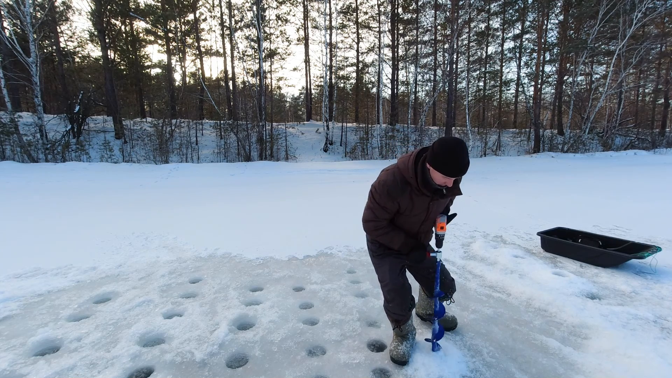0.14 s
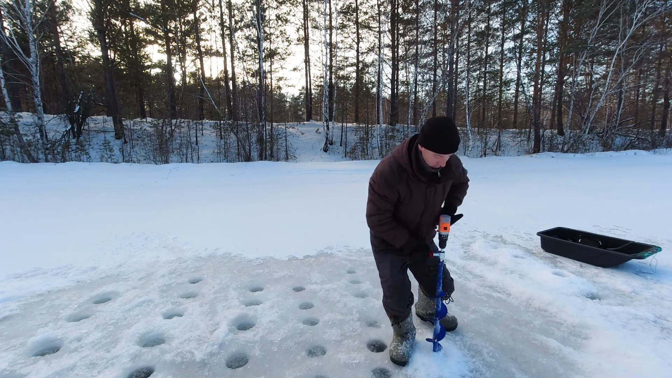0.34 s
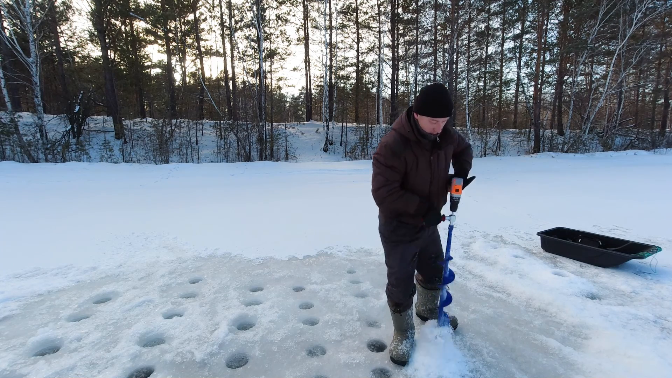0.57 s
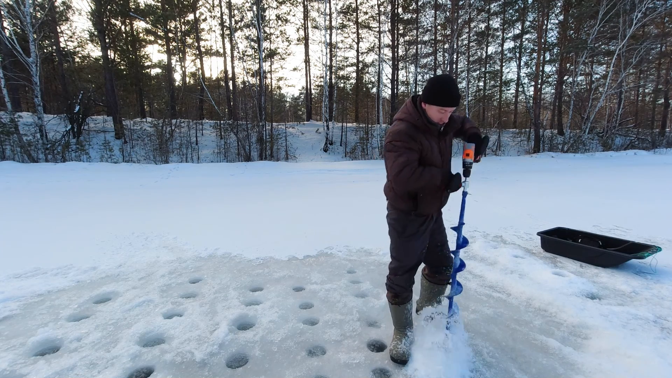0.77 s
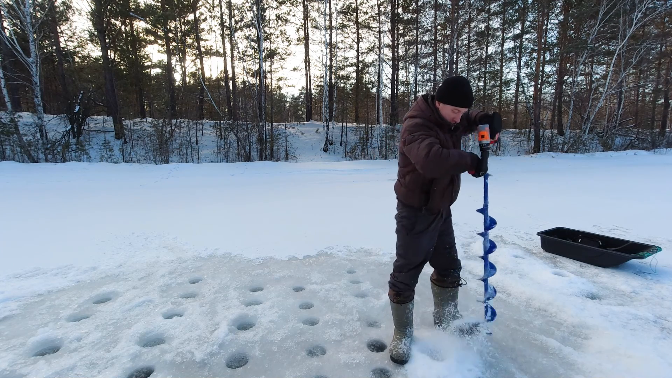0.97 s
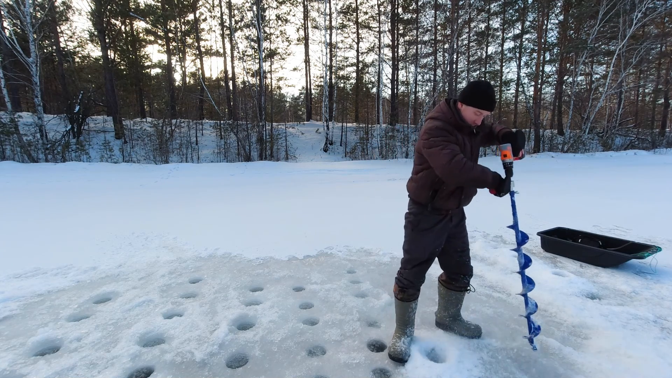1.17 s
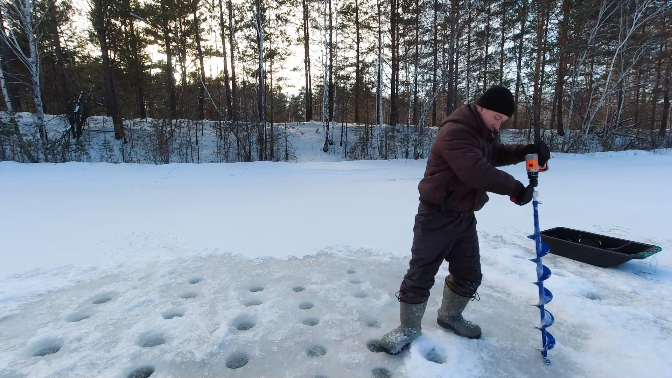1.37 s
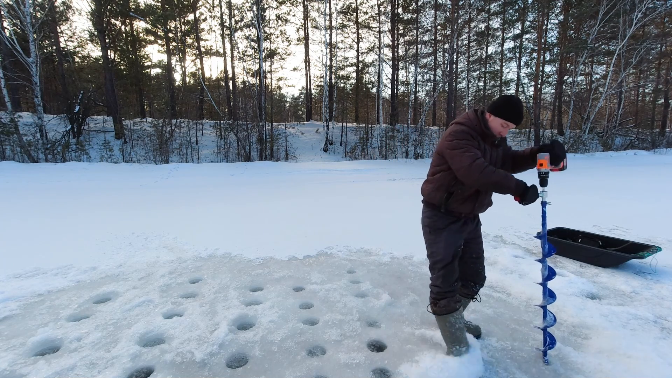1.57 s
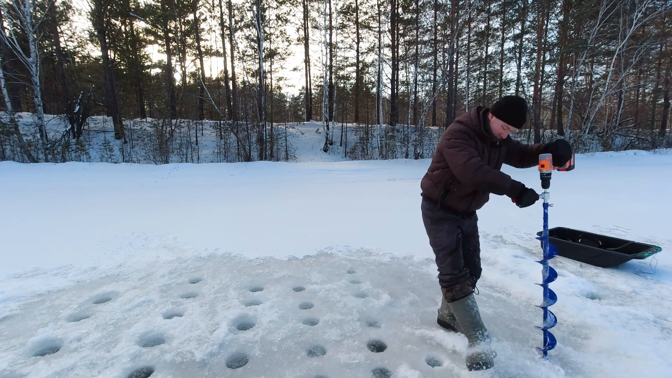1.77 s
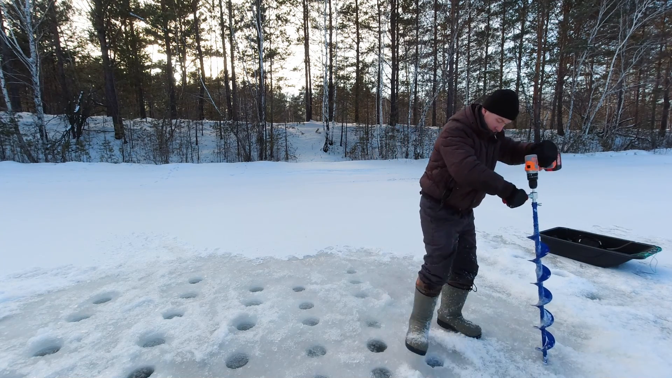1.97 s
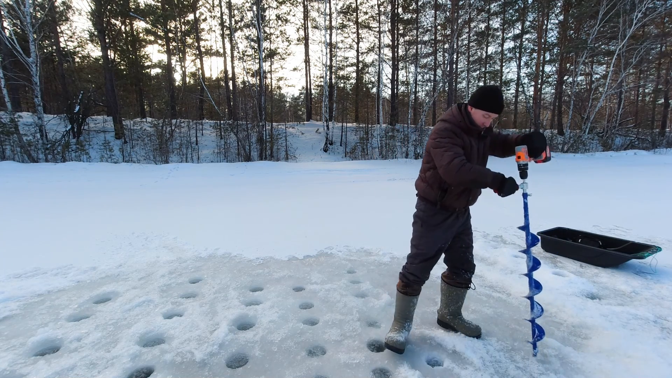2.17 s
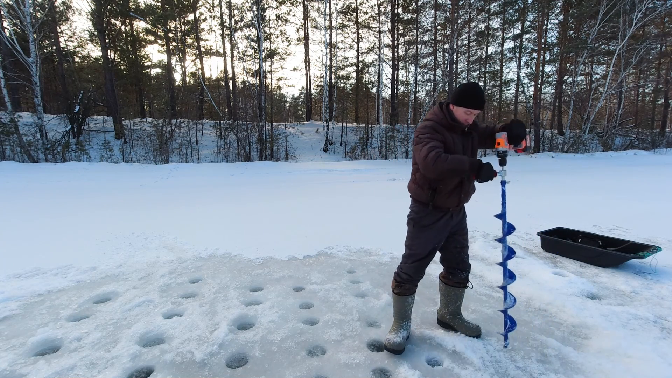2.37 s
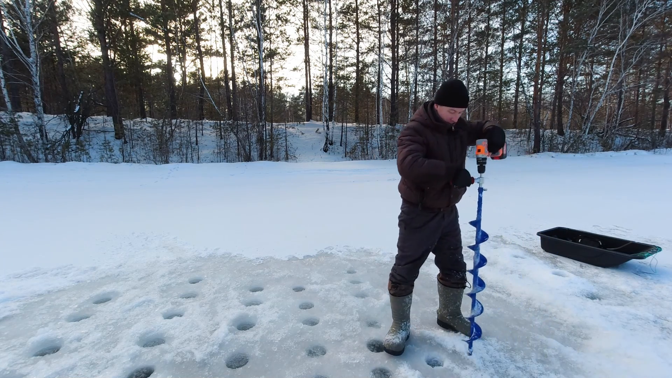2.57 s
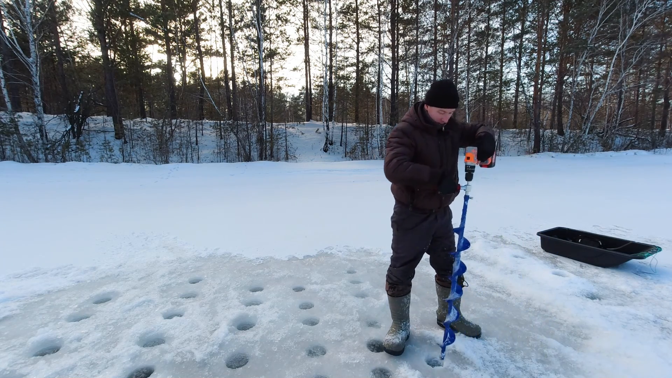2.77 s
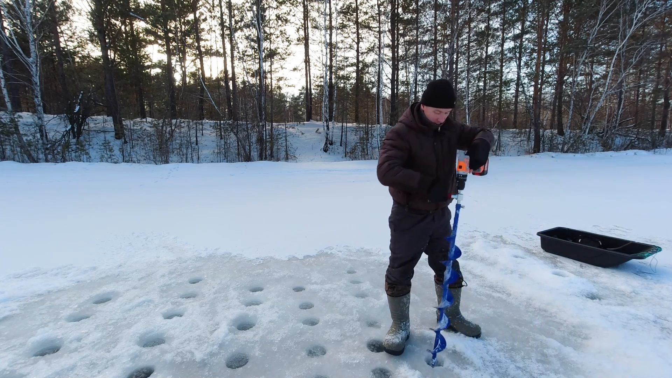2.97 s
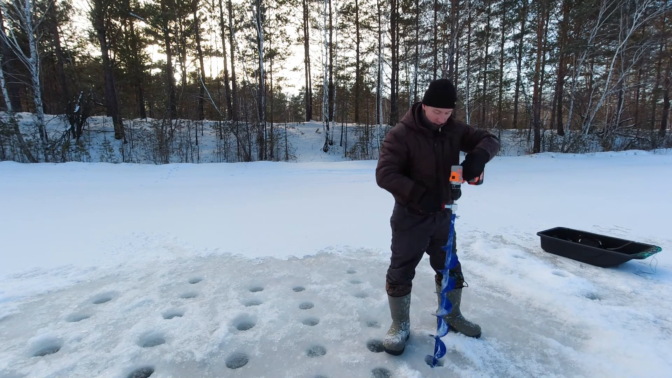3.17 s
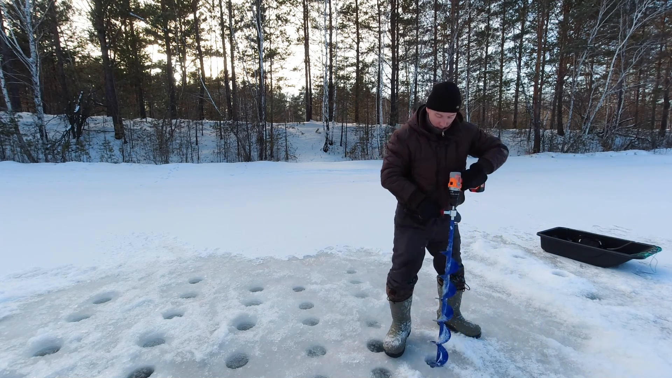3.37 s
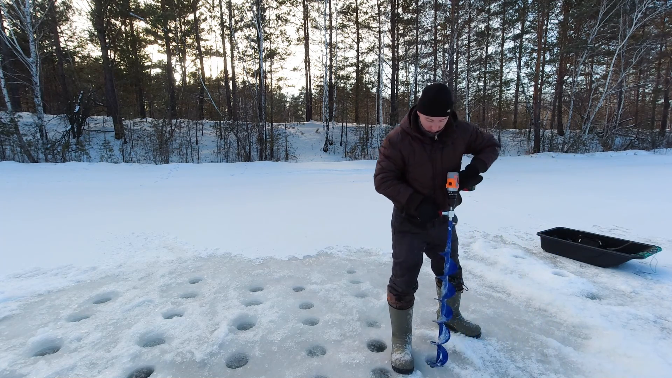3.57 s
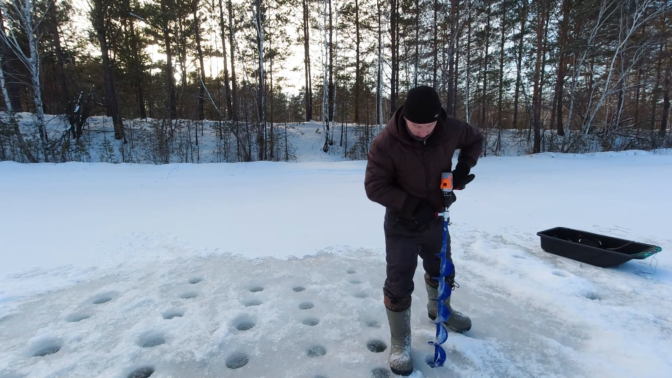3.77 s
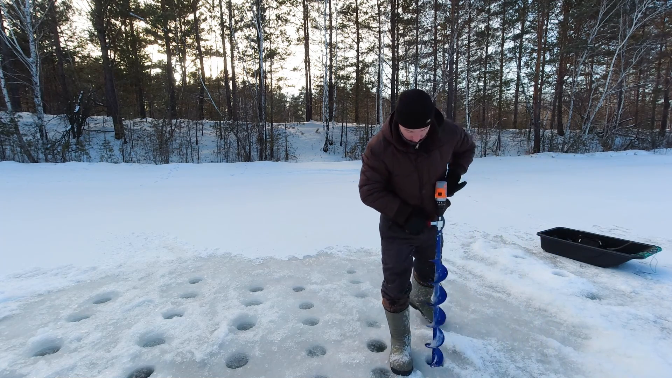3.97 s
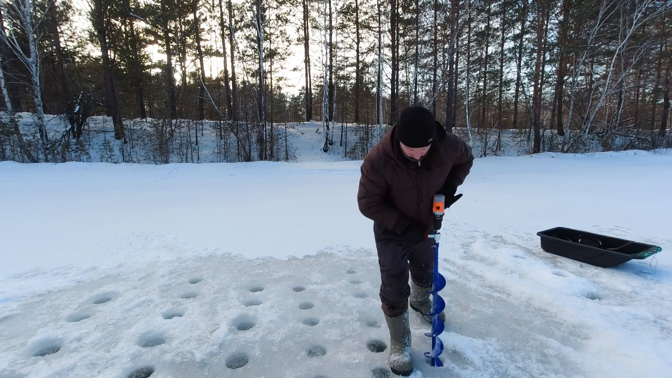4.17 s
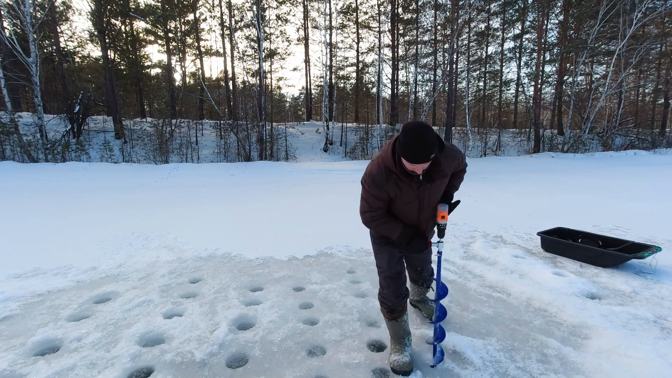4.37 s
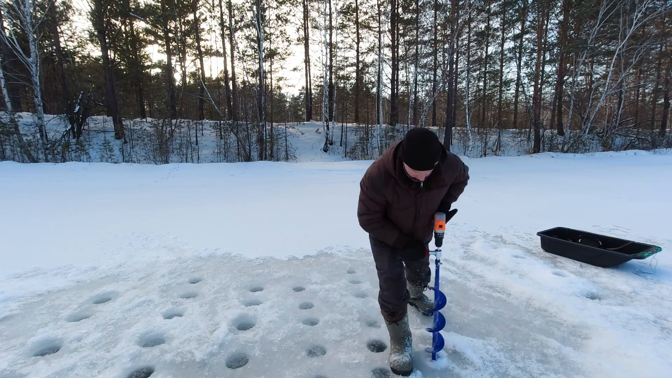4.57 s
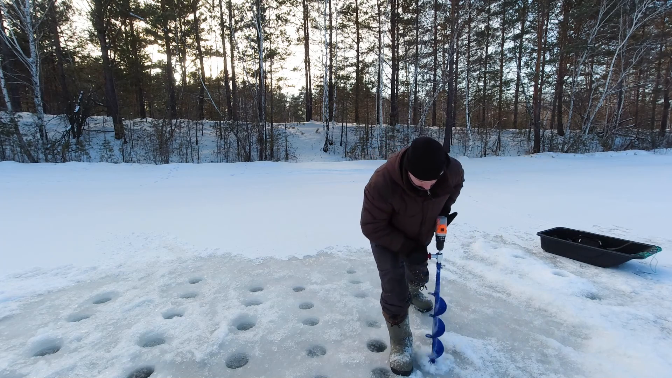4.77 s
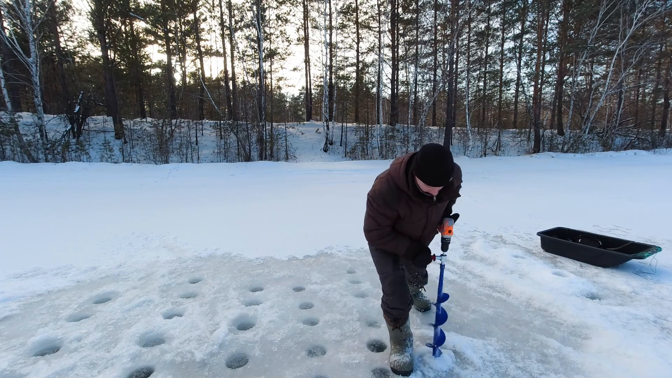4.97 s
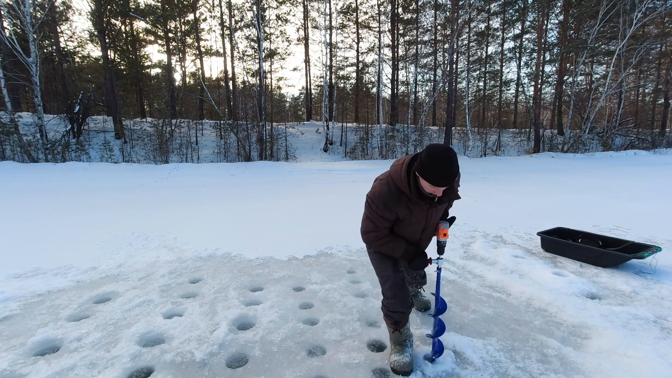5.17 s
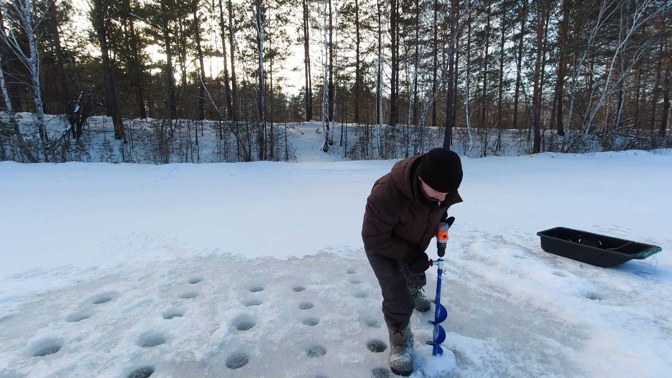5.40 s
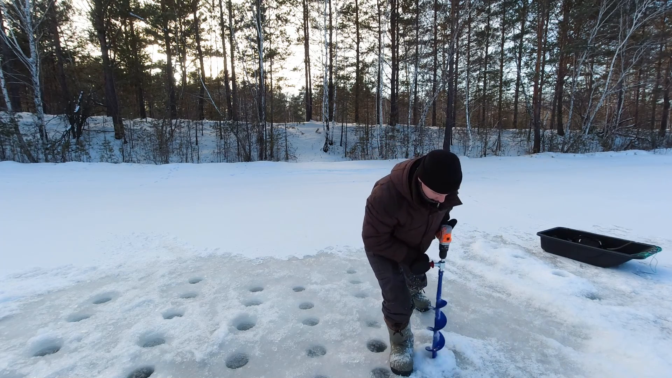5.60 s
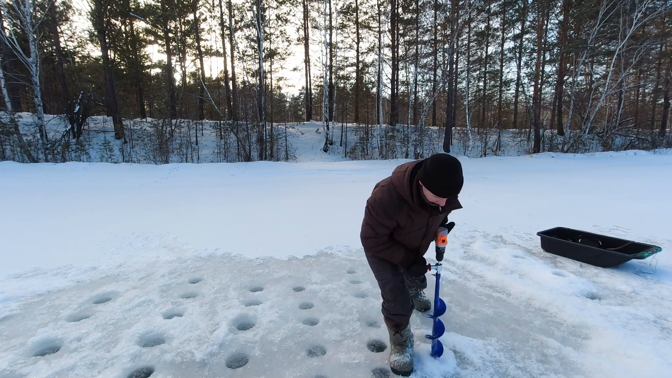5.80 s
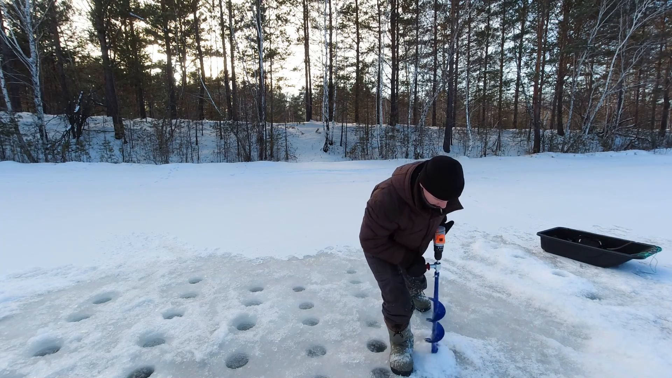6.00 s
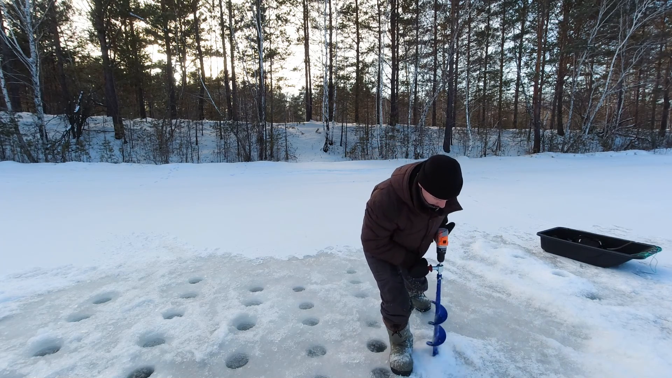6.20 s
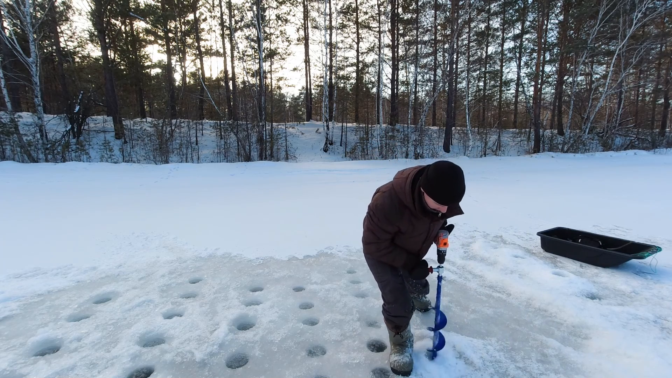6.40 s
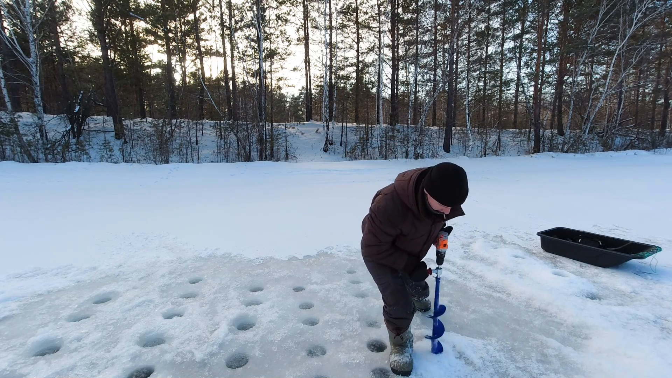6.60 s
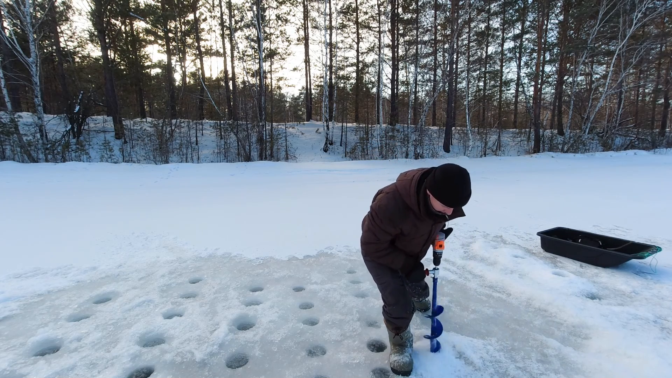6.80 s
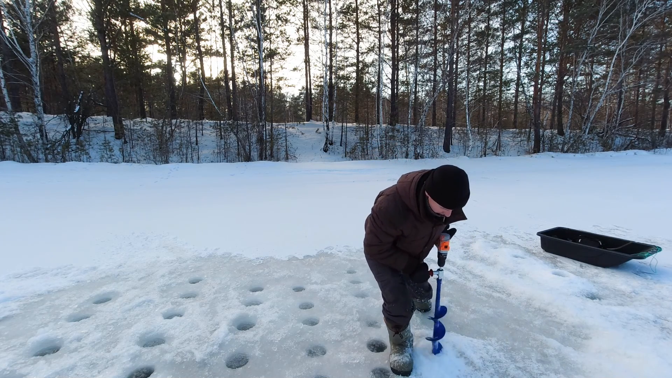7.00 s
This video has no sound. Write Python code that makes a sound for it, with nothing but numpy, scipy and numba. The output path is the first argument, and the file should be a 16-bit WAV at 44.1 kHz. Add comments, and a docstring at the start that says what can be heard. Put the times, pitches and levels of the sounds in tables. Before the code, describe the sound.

Open frozen lake, dry and quiet, faint low hum and slight wind, stereo microphone a few metres away. At 0 s the end of a drill run grinds and whines, dropping off within a tenth of a second into rapid soft ticks until about 0.25. From 0.5 to 0.8 the steel blades clatter in a fast, hard rattle as the auger comes free. From 0.7 to 2.4 loose snow pours off in bright gritty hisses, with boots crunching, dull thuds and crust pops. About 2.6 to 3.0 is almost silent, with tiny clicks. At 3.1 to 3.65 blades skid and scrape in quick ringing bursts, plus a few snow crunches. Near 4.0 the motor spins up to a high, rough whine with loud cracks; from 4.5 it sags and wavers lower as the blades grind ice steadily, rumbling, chattering and squeaking, still going at 7 s.

```python
"""Auger drilling lake ice

A cordless drill drives a steel auger into lake ice a few metres from a camera with two microphone ports.
The blades skid, chatter and grind: noise fractures ring the hole and the steel over a rumbling ice sheet.
The gearbox whines as tones in rough strands, the motor hisses, and blade edges squeak as sine glides.
Loose snow pours off the flights as bright grit; boots crunch and crust pops over a faint winter hum."""
import sys
import numpy as np
from scipy import signal
from scipy.fft import rfft, irfft, next_fast_len
from scipy.io import wavfile
from scipy.ndimage import uniform_filter1d
from numba import njit

SR = 44100
rng = np.random.default_rng(int(sys.argv[2]) if len(sys.argv) > 2 else 0)


def store_pcm(level_fs):
    """Save levels as 16-bit WAV."""
    pcm = np.round(np.clip(level_fs, -1, 1) * 32767).astype(np.int16)
    wavfile.write(sys.argv[1], SR, np.atleast_2d(pcm).T)


N = 310905  # samples, about 7 s


def undb(db):
    """Amplitude gain of a level in dB."""
    return 10 ** (np.asarray(db) / 20)


def unit(x):
    """Scale to an RMS of 1."""
    return x / np.sqrt(np.mean(x ** 2))


def noise():
    """White noise over the whole scene."""
    return rng.standard_normal(N)


def steady(hz):
    """A fixed frequency at every sample."""
    return np.full(N, float(hz))


def columns(*tables):
    """A smoothed gate that is open inside the tables, then their columns interpolated at every sample."""
    t = np.arange(N) / SR
    times, *values = np.concatenate(tables).T
    gate = sum((t > rows[0][0] - .001) & (t < rows[-1][0] + .01) for rows in tables)
    return [uniform_filter1d(1. * gate, 441)] + [np.interp(t, times, column) for column in values]


def colour(x, points):
    """Causal filter with the given (f/Hz, level/dB) shape, from the folded cepstrum."""
    hz, db = np.transpose(points)
    grid = np.linspace(1, SR / 2, 2049)
    shape_db = np.interp(np.log(grid), np.log(hz), db)
    cepstrum = irfft(np.log(undb(shape_db)))
    cepstrum[1:2048] *= 2
    impulse = irfft(np.exp(rfft(cepstrum[:2048], 4096)))
    return signal.oaconvolve(x, impulse)[:len(x)]


@njit
def ring(x, hz, width):
    """Band-pass resonance, width in Hz, whose centre may move every sample."""
    y, band, low = np.empty(len(x)), 0., 0.
    for i in range(len(x)):
        g = np.tan(np.pi * hz[i] / SR)
        damping = width / hz[i]
        v = (band + g * (x[i] - low)) / (1 + g * (g + damping))
        band, low, y[i] = 2 * v - band, low + 2 * g * v, damping * v
    return y


def walk(rate):
    """Random levels held 1 / rate s and slewed; spread near 1."""
    hold = int(SR / rate)
    steps = np.repeat(rng.standard_normal(N // hold + 1), hold)[:N]
    return 1.2 * uniform_filter1d(steps, hold)


LARGEST = 7  # cap on a fracture's size, in steps of the spread


def grains(spread_db, flicker_db, flicker_hz):
    """Dense fractures, a few much larger than the rest, coming in clumps."""
    size = np.minimum(rng.exponential(size=N), LARGEST)
    return unit(noise() * undb(spread_db * size + flicker_db * walk(flicker_hz)))


RISE_DB = 23  # height of the climb


def swell(s, rise, hold, db, fall_db_s):
    """Gain that climbs to a level, holds and falls at a steady rate in dB/s."""
    t = np.arange(N) / SR - s
    climb = RISE_DB * np.minimum(t / max(rise, .002) - 1, 0)
    return (t > 0) * undb(db + climb - fall_db_s * np.maximum(t - rise - hold, 0))


# tone colours of the far hum and the wind: (f/Hz, level/dB)
HUM_COLOUR = [(40, -12), (110, -4.5), (160, -15.5), (200, -9.5), (400, -8), (650, -10.5), (1000, -17.5),
              (1500, -28.5), (3000, -39.5), (5000, -58), (15000, -62)]
WIND_COLOUR = [(10, -7), (25, -3), (50, -1), (90, -27.5), (200, -45)]
HUM_DB, HUM_SWELL_DB, WIND_DB = -54, 1.8, -57  # hum level is that of the part the ports share


def air():
    """Far hum of the valley, alike on both ports in the bass; light wind flutters on each port alone."""
    mid, side = (colour(noise() * undb(HUM_SWELL_DB * walk(5.0)), HUM_COLOUR) for _ in range(2))
    side = side - ring(side, steady(180), 710.0)  # thin the bass of the difference
    hum = np.array([mid + 0.57 * side, mid - 0.69 * side]) / np.std(mid)
    wind = [unit(colour(noise() * undb(5.8 * walk(1.0)), WIND_COLOUR)) for _ in range(2)]
    return undb(HUM_DB) * hum + undb(WIND_DB) * np.array(wind)


# tone colour of the tree line's echo: (f/Hz, level/dB)
SHORE_COLOUR = [(300, -24.5), (1500, -18.5), (4000, -4), (8000, -30)]


def shore(x, echo_db, t60):
    """A faint diffuse return from the trees: decaying noise, unrelated left and right."""
    t = np.arange(int(.6 * SR)) / SR
    decay = undb(-60 * t / t60)
    tails = [unit(colour(rng.standard_normal(len(t)), SHORE_COLOUR)) * decay for _ in range(2)]
    return undb(echo_db) * signal.oaconvolve(x[None], np.array(tails), axes=1)[:, :N]


# boots pressing snow: (t/s, rise/s, hold/s, level/dB, thud level/dB against it)
BOOTS = [(0.791, 0.022, 0.29, -53.5, -5.5), (1.051, 0.025, 0.051, -48, 1), (1.15, 0.036, 0.045, -46, -0.5),
         (1.2, 0.08, 0.07, -46.5, -16), (1.263, 0.11, 0.039, -35.5, -16.5), (1.471, 0.076, 0.14, -31, -2.5),
         (1.705, 0.029, 0.11, -47, -23.5), (1.802, 0.04, 0.35, -58, -1.5), (2.249, 0.1, 0.0078, -37.5, -21),
         (2.526, 0.0039, 0.015, -52, -6.5), (2.583, 0.011, 0.0035, -51.5, -17),
         (3.404, 0.034, 0.22, -62.5, 1.5), (3.691, 0.03, 0.042, -45, -1.5), (3.763, 0.045, 0.077, -58.5, 1)]
# lumps of snow crust giving way, and one dry crack of the blades at 3.9 s: (t/s, initial level/dB, f/Hz)
POPS = [(0.939, -33, 11000), (1.095, -21, 13000), (1.105, -33.5, 227), (1.184, -25.5, 660),
        (1.279, -18.5, 10200), (1.2815, -19.5, 10300), (1.589, -25.5, 485), (1.621, -44, 326),
        (1.649, -14.5, 790), (1.664, -20, 197), (2.337, -24.5, 1560), (2.35, -34, 149),
        (2.535, -43.5, 1490), (2.536, -41.5, 224.4), (2.595, -34.5, 1100), (2.7055, -47.5, 1960),
        (2.7402, -55.5, 2460), (2.798, -54, 2090), (2.852, -59, 2200), (2.9492, -56, 2310),
        (3.545, -46, 2500), (3.76, -25.5, 920), (3.9068, -20, 3360), (3.706, -38.5, 1500)]
# tone colours of the creak and the thud: (f/Hz, level/dB)
TREAD_COLOUR = [(400, -10), (900, -6), (2000, -8), (3400, -9.5), (4500, -18), (9000, -49), (16000, -41)]
THUD_COLOUR = [(30, -11), (90, 1), (200, -5), (500, -3.5), (900, -29.5)]
BOOT_FALL_DB_S = 453


def boots():
    """Packed snow creaks under the sole with a dull thud; lumps of crust pop, and the blades crack once, as
    short decaying sines."""
    creak_gain, thud_gain = 0, 0
    for s, rise, hold, db, thud_db in BOOTS:
        press = swell(s, rise, hold, db, BOOT_FALL_DB_S)
        creak_gain = creak_gain + press
        thud_gain = thud_gain + press * undb(thud_db)
    out = creak_gain * unit(colour(grains(1.8, 2.2, 100), TREAD_COLOUR))
    out += thud_gain * unit(colour(grains(1.4, 0.54, 29.7), THUD_COLOUR))
    t = np.arange(int(0.022 * SR)) / SR
    for s, peak_db, hz in POPS:
        i = int(s * SR)
        pop = np.exp(-t * hz / 1.94) * np.sin(2 * np.pi * hz * t)  # fades within a few cycles
        out[i:i + len(t)] += undb(peak_db) * pop
    return out


# snow pouring off the flights, two spells: (t/s, level/dB)
SPRAY = [
    [(0.72, -31), (0.728, -43), (0.988, -31), (1.158, -41), (1.2, -36), (1.266, -36.5), (1.276, -31.5),
     (1.344, -42.5), (1.392, -30), (1.48, -59)],
    [(1.48, -58), (1.53, -37.5), (1.67, -28.5), (1.704, -36), (1.756, -24), (1.894, -28), (1.956, -21.5),
     (2.19, -29), (2.4, -60.5), (2.62, -73.5)],
]
# snow thrown up by the skidding blades: (t/s, rise/s, hold/s, level/dB)
THROWN = [(0.571, 0.0096, 0.11, -33), (0.626, 0.027, .02, -32), (3.2, 0.016, 0.098, -30.5),
          (3.331, 0.011, 0.0081, -27), (3.38, .005, 0.21, -73), (3.586, 0.044, 0.0057, -40),
          (3.645, .005, 0.174, -70)]
# tone colour of loose snow: (f/Hz, level/dB)
SNOW_COLOUR = [(2500, -36), (3600, -10), (6000, -8.5), (8500, -10), (9800, 5), (11000, 4.5), (13000, -0.5),
               (15400, 2.5)]
THROWN_FALL_DB_S = 898.5


def spray():
    """Fine crystals: a bright, slightly gritty hiss."""
    gate, db = columns(*SPRAY)
    gain = gate * undb(db) + sum(swell(*row, THROWN_FALL_DB_S) for row in THROWN)
    return gain * unit(colour(grains(1.86, 1.0, 120), SNOW_COLOUR))


# motor speed, sagging under load, two runs: (t/s, gear mesh f/Hz, whine level/dB)
SPEED = [
    [(0.0, 2406, -23), (0.07, 466.9, -59)],
    [(3.9, 300.6, -53.5), (3.99, 1100, -49), (4.05, 2691, -51), (4.09, 2915, -24), (4.12, 3234, -27),
     (4.155, 3364, -23.5), (4.28, 3326, -26), (4.36, 2950, -52), (4.43, 3109, -29), (4.5, 3310, -26.5),
     (4.53, 3017, -33), (4.61, 2950, -25), (4.65, 2720, -27), (4.75, 2690, -32), (4.79, 2697, -35),
     (4.83, 2704, -28), (4.89, 2667, -33), (4.93, 2535, -29), (5.0, 2427, -32), (5.11, 2710, -26),
     (5.18, 2558, -39), (5.3, 2553, -31.5), (5.35, 2402, -30), (5.41, 2133, -47), (5.46, 1992, -25),
     (5.51, 2312, -29), (5.58, 2510, -36), (5.64, 2500, -42), (5.74, 2620, -35), (5.8, 2689, -42),
     (6.0, 2700, -46), (6.07, 3020, -37), (6.125, 3100, -33), (6.14, 3000, -52), (6.17, 2680, -37),
     (6.2, 2700, -46), (6.27, 2600, -40), (6.3, 2520, -28), (6.38, 2290, -29), (6.45, 2230, -30),
     (6.52, 2174, -32), (6.55, 2430, -26), (6.59, 2460, -25), (6.62, 2714, -33), (6.69, 2803, -35),
     (6.72, 2550, -39), (6.75, 2420, -30), (6.81, 2440, -30.5), (6.835, 2590, -40), (6.9, 2790, -28),
     (7.05, 2720, -43.5)],
]
# tone colour of the motor: (f/Hz, level/dB)
MOTOR_COLOUR = [(2500, -14.5), (4000, -2), (5200, -3.5), (6100, -8.5), (7700, -10), (10500, -4.5),
                (13000, -12), (15500, -14.5)]
LOADED_HZ, HISS_DB, HISS_POWER = 2500, -29.5, 1.7  # mesh and level at the loaded speed; power of speed


def motor_hiss():
    """The motor's broad hiss grows as a power of its speed."""
    turning, mesh_hz, _ = columns(*SPEED)
    hiss = unit(colour(grains(0.33, 1.0, 60), MOTOR_COLOUR))
    return turning * undb(HISS_DB) * hiss * (mesh_hz / LOADED_HZ) ** HISS_POWER


# rough strands of the gear train: (multiple of the mesh f, level/dB)
ORDERS = [(1 / 6, -17.5), (1 / 3, -9), (1 / 2, -18), (2 / 3, -7), (5 / 6, -11), (1, 0)]
BREAK_DB = 7  # how deeply the whine breaks up


def gears():
    """Teeth knock unevenly, so each order is a wavering tone in a rough strand."""
    gate, mesh_hz, whine_db = columns(*SPEED)
    whine = 0
    for order, order_db in ORDERS:
        hz = order * mesh_hz
        strand = unit(ring(grains(2.0, 1.8, 60), hz * (1 + 0.008 * walk(30)), 45.0))
        tone = np.sin(2 * np.pi * np.cumsum(hz * (1 + .009 * walk(80))) / SR)
        strand = strand * undb(-BREAK_DB * np.abs(walk(40)))
        tone = tone * undb(-BREAK_DB * np.abs(walk(45)))
        whine = whine + undb(order_db) * (.8 * strand + 1.2 * tone)
    return gate * undb(whine_db) * whine


# the chuck runs out: start t/s, stop t/s, pairs of ticks per s
COAST_START, COAST_STOP, COAST_RATE = .052, .256, 39.5
COAST_HZ, COAST_DB = 2450, -66.5  # centre of the ticks; their RMS over the whole scene
# tone colour of the blades: (f/Hz, level/dB)
BLADES_COLOUR = [(300, -28.5), (700, -5.5), (1100, -2), (1700, -1), (2500, -1.5), (3600, -1.5), (4800, -19),
                 (7700, -49), (16000, -40)]


def chuck_ticks():
    """Gear teeth tick as the chuck runs out: puffs of noise ring a narrow band over a soft hiss."""
    t = np.arange(N) / SR
    running = (t > COAST_START) * (t < COAST_STOP)
    turn = np.cos(2 * np.pi * COAST_RATE * (t - COAST_START))
    # strong and weak ticks alternate
    puffs = running * (0.43 + np.abs(turn) ** 4.0 * (0.49 + 0.27 * turn))
    ticks = unit(ring(noise() * puffs, steady(COAST_HZ), 150.0))
    hiss = unit(colour(noise() * (puffs > 0), MOTOR_COLOUR))
    rattle = unit(colour(noise() * puffs, BLADES_COLOUR))
    return undb(COAST_DB) * (ticks + 0.092 * hiss + 0.65 * rattle)


# a blade edge squeaks on the ice: (t/s, length/ms, from f/Hz, to f/Hz, level/dB before the husk)
SQUEAKS = [(4.071, 160, 548, 517.5, -35.5), (4.09, 43, 1950, 1973, -28.5), (4.175, 29, 2450, 2410, -36),
           (4.179, 33, 1330, 1290, -35), (4.51, 42, 452, 492, -34), (4.642, 20, 2070, 2100, -26),
           (4.794, 23, 3170, 2590, -27), (4.89, 106, 1690, 1730, -24), (4.989, 50, 1744, 1790, -26),
           (5.084, 50, 1714, 1674, -31.5), (5.18, 57, 1613, 1606, -25.5), (5.31, 60, 1790, 1708, -23),
           (5.38, 90, 1282, 1450, -24.5), (5.55, 54, 1590, 1732, -22.5), (5.585, 55, 1100, 1035, -26),
           (5.66, 67, 1990, 1970, -25), (5.72, 75, 1950, 2380, -30.5), (5.78, 47, 1194, 1112, -26),
           (5.87, 83, 2030, 2210, -26.5), (5.96, 55, 1565, 1407, -26), (6.14, 76, 1800, 1860, -33.5),
           (6.169, 33, 863, 936, -37), (6.283, 49, 1686, 1520, -27), (6.4, 34, 1740, 1750, -40.5),
           (6.645, 53, 2090, 2160, -28), (6.67, 65, 1286, 1253, -37), (6.88, 63, 967, 928, -36.5)]


def squeaks():
    """A sliding blade edge gives short gliding tones, slightly husky."""
    out = np.zeros(N)
    for s, length_ms, from_hz, to_hz, db in SQUEAKS:
        i, n = int(s * SR), int(length_ms / 1000 * SR)
        glide = np.sin(2 * np.pi * np.cumsum(np.linspace(from_hz, to_hz, n)) / SR)
        out[i:i + n] += undb(db) * np.sqrt(2 * np.hanning(n)) * glide
    return out * (.55 + .8 * walk(260))


# modes of the auger: (f/Hz, width/Hz, level/dB)
AUGER_MODES = [(616, 550, 2.5), (1100, 88, 2), (1450, 120, 10), (1980, 110, 13), (2500, 100, 4),
               (2950, 150, 7), (3610, 123, 6.5)]


def steel(x):
    """The auger's fixed modes, alternating in sign."""
    return sum((-1) ** k * undb(db) * ring(x, steady(hz), float(width))
               for k, (hz, width, db) in enumerate(AUGER_MODES))


# the blades slip and catch: (t/s, nominal peak level/dB, strongest ring f/Hz, length/ms)
SLIPS = [(0.236, -35, 1620, 13), (0.513, -24.5, 1455, 22), (0.536, -28, 1050, 22), (0.557, -26, 2680, 21),
         (0.579, -11, 2590, 27), (0.6, -11.5, 1860, 19.5), (0.622, -14.5, 1325, 18), (0.639, -9, 730, 3),
         (0.648, -10.5, 1776, 17), (0.67, -10, 2410, 14), (0.69, -19, 1360, 24), (0.708, -7, 1960, 18),
         (0.739, -4, 1664, 10.5), (0.752, -14, 1580, 17), (0.778, -13, 2100, 20.7), (3.075, -24, 1860, 12),
         (3.091, -23, 1990, 10), (3.104, -27, 1450, 16), (3.138, -18.5, 1900, 10.2), (3.15, -21, 2000, 14),
         (3.172, -30.5, 1940, 20), (3.208, -11, 2040, 13), (3.219, -15, 1850, 9.3),
         (3.228, -18, 1493, 12.6), (3.244, -15.5, 1470, 26), (3.263, -17, 1545, 29), (3.284, -21, 1435, 19),
         (3.3, -11.5, 1477, 14), (3.317, -14, 1470, 14), (3.332, -15, 1476, 22), (3.345, -11, 1420, 13),
         (3.572, -36.5, 884, 17), (3.584, -17.5, 1930, 23.5), (3.61, -28.5, 1534, 32),
         (3.629, -17.5, 1480, 7.6), (3.878, -27, 1940, 10), (3.888, -26.5, 1910, 8.2),
         (3.948, -21, 1950, 34), (4.01, -13.5, 2070, 12), (4.033, -16, 1980, 16), (4.053, -9, 1936, 9.9),
         (4.082, -8, 3050, 11), (4.114, -7, 2030, 10), (4.155, -9.5, 3340, 22), (4.19, -5, 2480, 9.7),
         (4.225, -9, 1836, 14), (4.274, -6, 1750, 11), (4.314, -11.5, 2090, 12), (4.328, -10.5, 2080, 40),
         (4.4, -11.5, 2120, 19), (4.456, -21.5, 3080, 8.5), (4.497, -11.5, 3200, 9), (4.524, -10, 1076, 22),
         (4.626, -9, 2480, 15), (4.644, -12.5, 2080, 12), (4.725, -15, 900, 10), (4.802, -9, 847, 22),
         (4.871, -10.5, 1320, 21), (5.059, -9, 2420, 20), (5.199, -19, 1500, 31), (5.268, -5.5, 1730, 6.8),
         (5.292, -7, 1680, 5.5), (5.437, -13, 1300, 17), (5.578, -10.5, 1790, 12), (5.604, -7.5, 1735, 10),
         (5.661, -15, 1770, 11), (5.709, -11.5, 1390, 8.1), (5.827, -12.5, 1510, 16),
         (6.137, -15.5, 1300, 14), (6.29, -11, 1655, 18), (6.544, -10, 1070, 18), (6.566, -14.5, 1575, 16),
         (6.601, -20, 1620, 14), (6.752, -13.5, 2450, 39), (6.836, -11, 1473, 18), (6.997, -9.5, 1374, 16),
         (7.04, -9, 1650, 14)]
# tone colours of a slip's treble and knock: (f/Hz, level/dB)
BITE_COLOUR = [(3000, -37), (5000, -16), (7700, -1), (10500, -2), (13000, -24), (15500, 2)]
KNOCK_COLOUR = [(30, -26), (90, 9.5), (200, 11), (500, -1.5), (800, -9.5), (1300, -9)]
CRACK_DB, CHIPS_DB, KNOCK_DB = 1, -10.5, -38.5  # parts of a slip against its nominal peak
TREBLE_DB, TREBLE_STEEP = -24.5, 0.35  # treble of a slip peaking at 0 dB; dB of treble per dB of peak
UNEVEN_DB = 4  # scatter of treble and knock from slip to slip
TAIL = .13  # weight of the part that lingers
CRACK_CYCLES = 6  # longest decay time of a crack, in cycles
CRACK_FADE_DB = 8  # a slip of double length cracks this much softer


def slips():
    """Each slip is a crack and a burst of fractures that rings the steel."""
    chips = grains(2.55, 2.85, 200)
    push, bright, knock, crack = np.zeros((4, N))
    hz = steady(1800)
    t = np.arange(int(.15 * SR)) / SR
    chances = UNEVEN_DB * rng.standard_normal((len(SLIPS), 2))
    for (s, peak_db, ring_hz, length_ms), (treble_chance, knock_chance) in zip(SLIPS, chances):
        i = int(s * SR)
        here, room = slice(i, i + len(t)), N - i
        length = max(length_ms, 2) / 1000
        fall = np.exp(-(t / length) ** 2) + TAIL * np.exp(-t / 0.015)
        shape = ((1 - np.exp(-t / 0.0025)) * fall)[:room]
        push[here] += undb(peak_db + CHIPS_DB) * shape
        bright[here] += undb(TREBLE_STEEP * peak_db + TREBLE_DB + treble_chance) * shape
        knock[here] += undb(peak_db + KNOCK_DB + knock_chance) * shape
        hz[i:] = ring_hz
        crack_db = peak_db + CRACK_DB - CRACK_FADE_DB * np.log2(100 * length)
        decay = np.exp(-t / min(0.3 * length, CRACK_CYCLES / ring_hz))
        snap = (1 - np.exp(-t / 0.0015)) * decay * np.sin(2 * np.pi * ring_hz * t)
        crack[here] += undb(crack_db) * snap[:room]
    paths = ((0.4, lambda x: ring(x, hz, 220.0)),
             (0.45, lambda x: colour(x, BLADES_COLOUR)),
             (0.7, steel))
    # each path is levelled on unbroken chips, so the bursts keep their own levels
    body = sum(share * path(chips * push) / np.std(path(chips)) for share, path in paths)
    thump = colour(chips * knock, KNOCK_COLOUR) / np.std(colour(chips, KNOCK_COLOUR))
    treble = bright * unit(colour(chips, BITE_COLOUR))
    return crack + body + thump + treble


# how hard the blades cut, two runs: (t/s, cut level/dB, ice rumble level/dB against the cut, hole f/Hz)
CUT = [
    [(0.0, -20, -16, 1590), (0.014, -23.5, -10.5, 1630), (0.07, -62, 0, 1650)],
    [(3.85, -54, -13.5, 1860), (3.99, -35.5, -24, 1910), (4.04, -26, -35.5, 1950), (4.4, -27, -22, 1910),
     (4.49, -32.5, -17.5, 1580), (4.56, -28.5, -20.5, 1500), (4.7, -25.5, -16, 1640),
     (4.76, -29, -21, 1570), (4.795, -33, -11, 1590), (4.81, -27.5, -9, 1640), (4.83, -23.5, -12, 1810),
     (4.95, -21.5, -18.5, 1670), (5.15, -22.5, -19, 1490), (5.28, -22.5, -11.5, 1610),
     (5.32, -24, -21.5, 1690), (5.46, -23, -15.5, 1395), (5.56, -24.5, -26, 1550),
     (5.61, -23.5, -33.5, 1600), (5.66, -23.5, -12.5, 1510), (5.79, -22.5, -19, 1345),
     (6.0, -23, -15.5, 1620), (6.045, -28.5, -17, 1540), (6.14, -33, -22.5, 1624), (6.2, -31.5, -17, 1810),
     (6.235, -27, -22, 1490), (6.27, -22.5, -22, 1300), (6.31, -22.5, -19, 1550), (6.38, -23.5, -17, 1500),
     (6.45, -22, -15, 1676), (6.56, -21.5, -16, 1276), (6.62, -21.5, -12.5, 1660),
     (6.655, -24, -16.5, 1600), (6.68, -22.5, -7, 1390), (6.74, -23, -11, 1850), (6.78, -22.5, -15.5, 1610),
     (6.81, -27, -23.5, 1580), (6.87, -31.5, -16.5, 1500), (6.91, -28, -22, 1680), (6.98, -28, -19, 1640),
     (7.025, -27, -13.5, 1580), (7.05, -19.5, -17, 1646)],
]
# the blades dig in for a moment while the auger rocks: (t/s, rise/s, hold/s, added cut level/dB)
BITES = [(4.31, 0.011, 0.054, -30), (4.525, 0.013, 0.017, -34.5), (4.612, .015, 0.016, -25.5),
         (4.709, 0.019, 0.014, -28.5), (4.796, 0.0059, 0.0088, -24.5), (6.147, 0.017, 0.029, -28.5)]
BITE_FALL_DB_S = 699
# contact resonances that drift as the blades turn: (f/Hz, level/dB)
SCRAPE = [(900, -5), (1250, 0), (1550, -12.5), (1900, 0), (2300, -1.5), (2750, -17.5)]
# low resonances of the slush-packed hole: (f/Hz, level/dB)
GROAN = [(300, -21.5), (475, -9.5), (620, -13.5)]
# tone colours of coarse crushing and of the ice sheet: (f/Hz, level/dB)
CRUSH_COLOUR = [(60, -31.5), (200, -9.5), (300, -9.5), (470, -4.5), (700, 5.5), (950, 12), (1500, -43.5)]
ICE_COLOUR = [(50, -27), (80, 5.5), (105, 5.5), (150, 2), (250, -12), (400, -33)]
HOLE_HOP = .06  # share by which the ring of the hole hops
FULL_CUT_DB = -22
CRUSH_DB, CRUSH_STEEP = -8.5, 1.28  # crushing against a full cut; extra dB for each dB of cut


def cutting():
    """Blades crush ice and ring the hole and the steel; the sheet rumbles."""
    gate, steady_db, rumble_db, hole_hz = columns(*CUT)
    cut_gain = undb(steady_db) + sum(swell(*row, BITE_FALL_DB_S) for row in BITES)
    cut_db = 20 * np.log10(cut_gain)
    chips = grains(3.3, 1.8, 80)
    # the ring hops about as chips of different size break
    hole = ring(chips, np.clip(hole_hz * (1 + HOLE_HOP * walk(40)), 500, 4000), 170.0)
    scrape = sum(undb(db + 4.5 * walk(30)) * ring(chips, hz * (1 + 0.09 * walk(11)), 60.0)
                 for hz, db in SCRAPE)
    grind = unit(colour(chips, BLADES_COLOUR))
    cut = unit(.7 * grind + .85 * unit(hole) + .15 * unit(steel(chips)) + .85 * unit(scrape))
    groan = sum(undb(db + 4 * walk(20)) * unit(ring(chips, hz * (1 + .06 * walk(6)), 30.0))
                for hz, db in GROAN)
    coarse = unit(colour(chips * undb(3.7 * walk(30)), CRUSH_COLOUR))
    crush = (coarse + groan) * undb(CRUSH_DB + CRUSH_STEEP * (cut_db - FULL_CUT_DB))
    rumble = undb(rumble_db) * unit(colour(grains(0.99, 0.51, 22), ICE_COLOUR))
    return gate * cut_gain * (cut + crush + rumble)


def ports(x, lead):
    """The left port hears the source at a fixed phase against the right, mostly later."""
    hz, rad = np.transpose(lead)
    phase = np.interp(np.arange(N // 2 + 1) * SR / N, hz, rad)
    return np.array([irfft(rfft(x) * np.exp(1j * phase), N), x])


# wander of the phase between the ports: (f/Hz, phase/rad)
SCATTER = [(350, .2), (700, .3), (1400, .4), (2300, .55), (3500, .8), (5000, 1.4), (7000, 1.4), (9500, 1.4),
           (12500, 1.5), (16500, 1.5)]


def wander(pair):
    """Scatter off the moving man and rough snow turns the phase of each band, oppositely at the two ports."""
    size, centres = next_fast_len(N), np.transpose(SCATTER)[0]
    spectrum, hz = rfft(pair, size), np.arange(size // 2 + 1) * SR / size
    opposite = np.array([[1], [-1]])
    out = 0
    for k, (centre, rad) in enumerate(SCATTER):
        weight = np.interp(hz, centres, np.arange(len(centres)) == k)  # bands cross-fade
        band = np.fft.ifft(2 * spectrum * weight, size)[:, :N]
        out = out + np.real(band * np.exp(.5j * rad * walk(centre / 5) * opposite))
    return out


# steady phase of the left port against the right: (f/Hz, phase/rad)
AUGER_LEAD = [(0, 0), (3700, -1.42), (6500, -2), (13200, -5.5), (16000, -5)]
SNOW_LEAD = [(100, 0), (500, 0.1), (1400, 1), (3000, -1.5), (5500, -4.5), (9000, -5), (16000, -8)]


def scene():
    """Auger and snow reach the two ports, with the trees' echo and the winter air around them."""
    snow = boots() + spray()
    auger = motor_hiss() + gears() + chuck_ticks() + squeaks() + slips() + cutting()
    direct = wander(ports(auger, AUGER_LEAD) + ports(snow, SNOW_LEAD))
    return air() + shore(auger + snow, echo_db=-47.0, t60=0.16) + direct


TOP_HZ = 15750


def record(dry):
    """The camera cuts the top with a steep low-pass."""
    return signal.sosfilt(signal.ellip(10, .2, 70, TOP_HZ, fs=SR, output="sos"), dry)


dry = scene()
out = record(dry)
store_pcm(out)
```